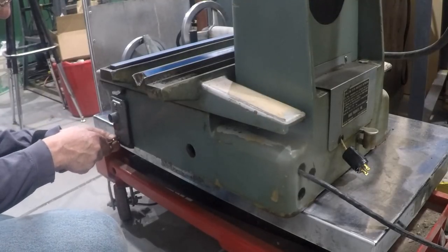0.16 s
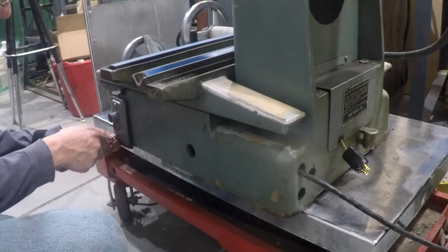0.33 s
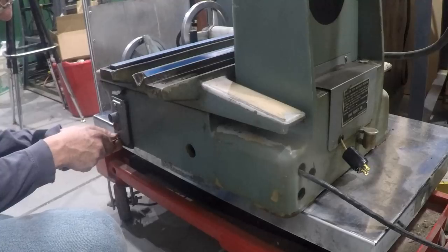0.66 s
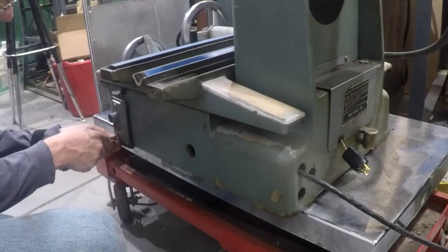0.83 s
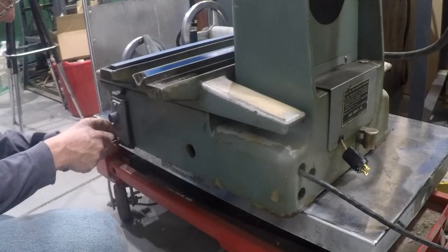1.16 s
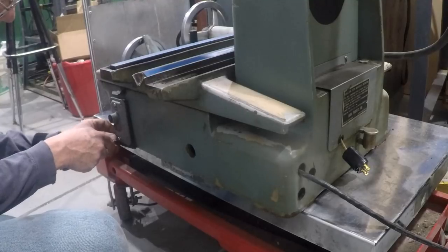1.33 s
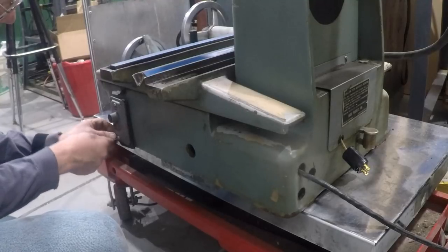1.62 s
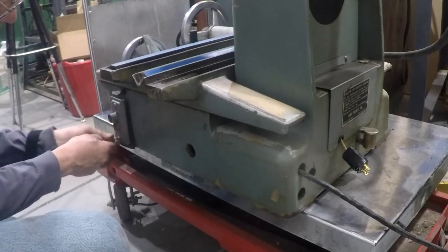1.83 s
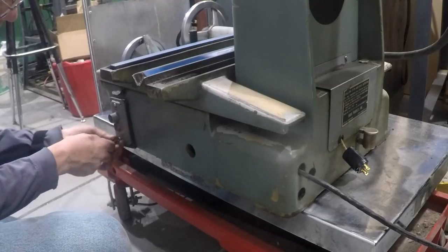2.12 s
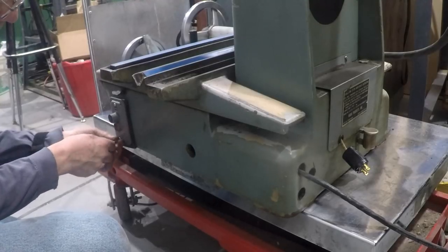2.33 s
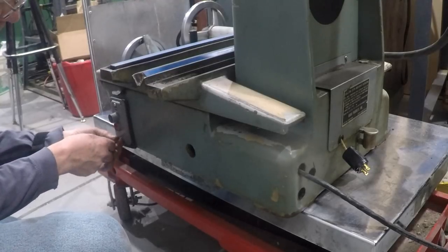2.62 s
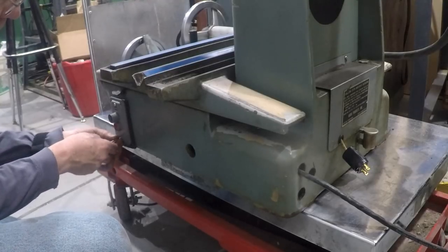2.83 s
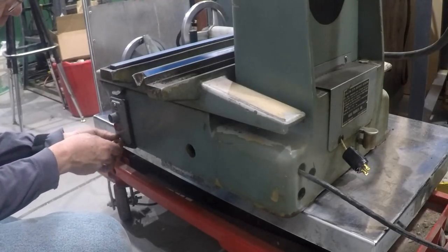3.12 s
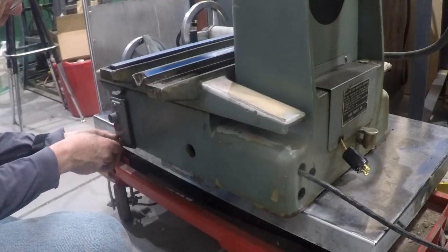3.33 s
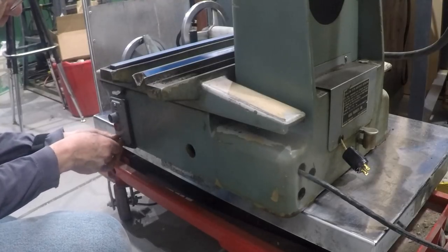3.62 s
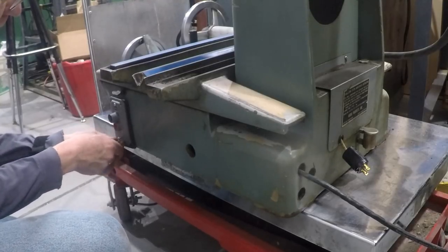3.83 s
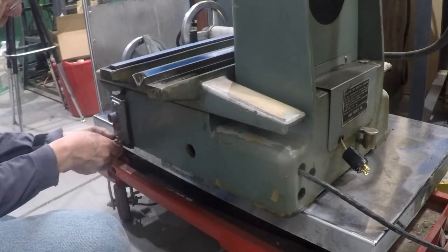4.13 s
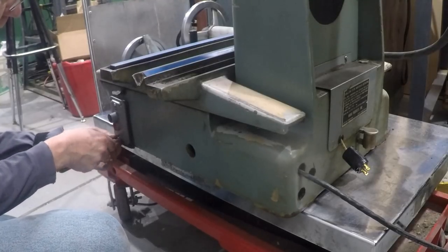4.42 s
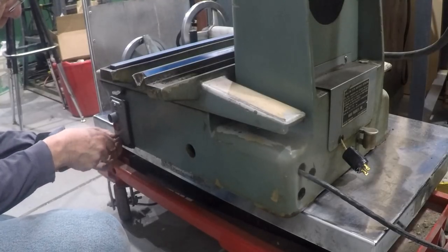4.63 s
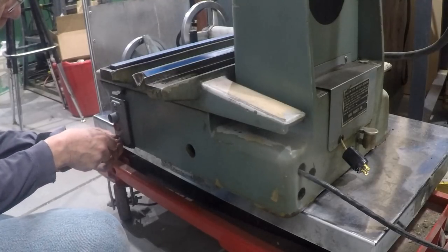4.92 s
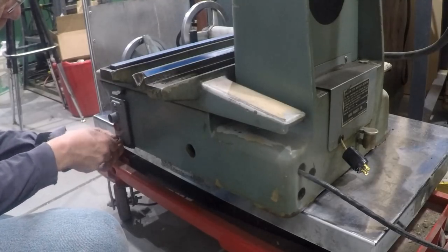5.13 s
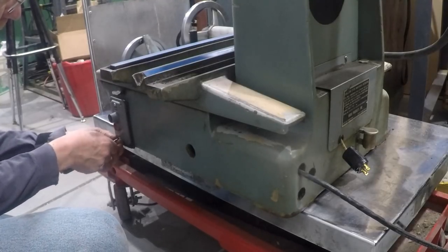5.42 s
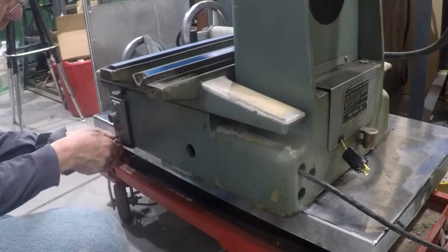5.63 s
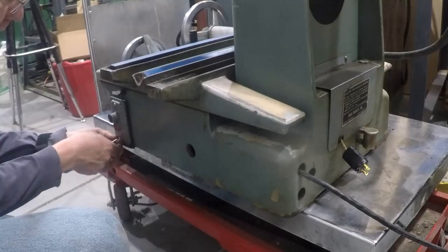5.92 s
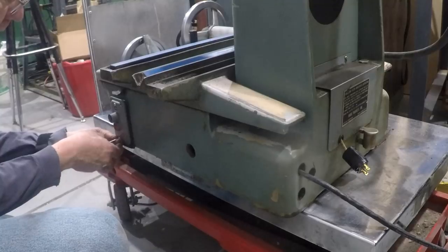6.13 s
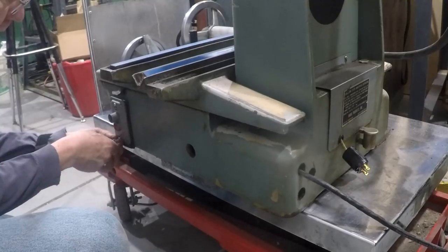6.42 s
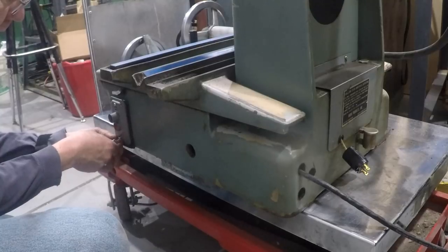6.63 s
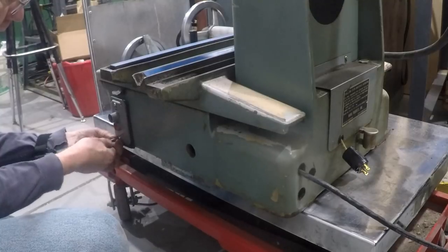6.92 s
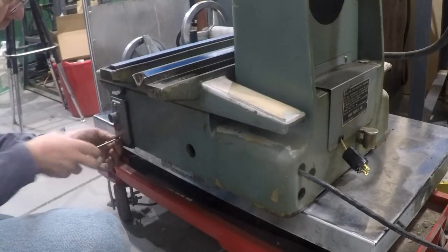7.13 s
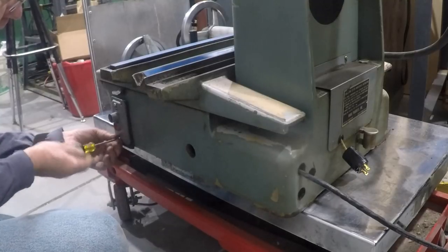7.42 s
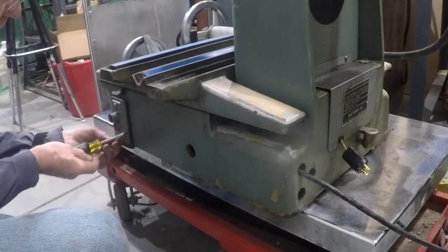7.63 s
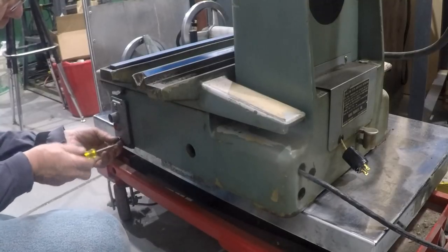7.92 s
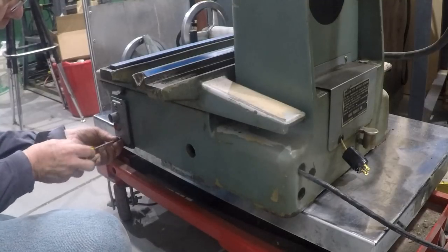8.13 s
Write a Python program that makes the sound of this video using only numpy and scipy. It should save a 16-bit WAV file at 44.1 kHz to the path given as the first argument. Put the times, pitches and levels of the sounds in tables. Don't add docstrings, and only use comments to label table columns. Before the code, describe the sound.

Irregular dry metal clicks, tiny pings and brief gritty scrapes come from a screwdriver fitting screws into a small cover on a heavy cast base. Work is busiest in the first three seconds, snaps loudly near four, thins out, then ends in a harder flurry with dull thuds, a sleeve rustle and another snap. Faint fan hum, airy noise and slight hiss fill the large room; short echo, single nearby microphone.

```python
import sys
import numpy as np
from scipy import signal
from scipy.fft import rfft, irfft, next_fast_len
from scipy.io import wavfile
from scipy.ndimage import uniform_filter1d, map_coordinates

SR = 44100
rng = np.random.default_rng(int(sys.argv[2]) if len(sys.argv) > 2 else 0)


def decibels_to_gain(level_db):
    exponent = np.asarray(level_db, float) / 20
    return 10 ** exponent


def put_to_file(sound):
    columns = np.atleast_2d(sound).T
    safe = np.clip(columns, -1, 1)
    whole_steps = np.round(safe * 32767)
    wavfile.write(sys.argv[1], SR, whole_steps.astype(np.int16))


N = 364266
FLOOR_TOP_HZ = 15350


def unit(x):
    return x / np.sqrt(np.mean(x ** 2) + 1e-20)


def along(points, hz):
    f, value = np.transpose(points)
    return np.interp(np.log(hz + 1), np.log(f + 1), value)


def wobble(rate, size=N):
    steps = np.arange(0, size + 16, 16)
    knots = rng.standard_normal(int(size / SR * 300) + 9)
    curve = map_coordinates(knots, [steps * min(rate, 290) / SR])
    return np.interp(np.arange(size), steps, curve)


def swell(s, db, hold, rise, fall):
    t = np.arange(N) / SR
    return decibels_to_gain(db - rise * np.clip(s - t, 0, None) - fall * np.clip(t - s - hold, 0, None))


def filtered(x, response):
    m = next_fast_len(N + SR // 4, True)
    return irfft(rfft(x, m) * response(np.fft.rfftfreq(m, 1 / SR)), m)[..., :N]


def noise(spectrum):
    white = rng.standard_normal(N)
    return unit(filtered(white, lambda hz: decibels_to_gain(along(spectrum, hz)) * (hz < FLOOR_TOP_HZ)))


def add(track, s, sound):
    part = track[round(s * SR):][:len(sound)]
    part += sound[:len(part)]


def ringing(modes, ragged_db=0, tilt_db=0):
    t = np.arange(SR * 2 // 5) / SR
    out = 0
    for hz, db, t60 in modes:
        beat = ragged_db * wobble(51.2, size=len(t)) if ragged_db else 0
        tilt = tilt_db * np.log2(hz / modes[0][0])
        level_db = db + tilt - 60 * t / min(t60, 0.6) + beat
        out = out + decibels_to_gain(level_db) * np.sin(2 * np.pi * hz * t + 0.12 * beat)
    return out * np.cos(np.pi / 2 * t / t[-1])


def slid(events, modes, ragged_db):
    out = np.zeros(N)
    for s, db, rise, tilt_db in events:
        ring = ringing(modes, ragged_db, tilt_db)
        build_up = 1 - np.exp(-np.arange(len(ring)) / SR / rise)
        add(out, s, decibels_to_gain(db) * ring * build_up)
    return out


# t/s, blade level/dB, bracket level/dB re blade, cover level/dB re blade,
# loudest blade mode f/Hz
STRIKES = [(.3157, -43.5, 3, 2.5, 6440), (.4798, -45, -4, 4, 6200), (.5252, -40.5, 2.5, -28, 6700),
           (.8364, -48, 6.5, -15, 6000), (1.516, -38.5, -11, -20, 5770), (1.5446, -46, -4, -12, 6000),
           (1.5484, -29.5, -7, -15, 6300), (1.6514, -35.5, -14, -10, 5900), (1.6606, -28, -8.5, -23, 5900),
           (1.6736, -22.5, -21, -44, 6350), (2.5845, -39, -5.5, -5, 5900),
           (3.6501, -24.5, -33, -24.5, 5770), (3.9255, -40, -11, -11.5, 5970),
           (4.0063, -43.5, 2.5, -6.5, 5930), (4.4857, -32, -9.5, -26, 6880), (4.8289, -38, -9.5, -8, 6250),
           (6.0165, -53, 0.5, -1, 5000), (6.0237, -31, -16, -24, 6040), (6.1863, -36, -7, -15, 5700),
           (6.6722, -36, -17, -20, 6200), (6.7221, -19.5, -15.5, -43.5, 6680), (7.7064, -34.5, -1, 3, 5280),
           (7.7104, -25, -15, -12, 6700), (7.7614, -31.5, -15, -22, 4530), (7.7734, -21, -25, -18.5, 5500),
           (7.7767, -28, -2.5, -19, 5660)]
# t/s, blade level/dB, loudest blade mode f/Hz
TICKS = [(0.506, -39.5, 7140), (0.6078, -44, 6500), (0.699, -40, 6850), (.7094, -43, 6800),
         (0.7632, -44, 6800), (0.823, -43, 6200), (.8954, -45.5, 6100), (1.0318, -48, 6430),
         (1.2503, -45, 5170), (1.3034, -48, 5180), (1.355, -49, 6130), (1.9684, -45, 5290),
         (2.2466, -50, 5000), (2.3471, -47, 6900), (2.7434, -48.5, 5540), (3.5087, -43, 5400),
         (3.5253, -40.5, 5840), (3.6102, -54, 5070), (4.248, -47, 6800), (4.311, -40, 7050),
         (4.352, -52, 5620), (5.5887, -54.5, 4610), (5.6017, -47.5, 6280), (6.1704, -42, 6210),
         (6.6064, -56, 6220), (6.708, -45.5, 6050), (7.6188, -43.5, 6040), (7.7547, -50, 5300),
         (8.0283, -46, 5500)]
# t/s, blade level/dB, cover level/dB re blade
KNOCKS = [(0.4703, -47.5, 6), (.8041, -55.5, 12), (.8639, -52, 5), (1.0051, -57, 9.5), (1.0221, -55, 0),
          (1.1902, -49.5, 4.5), (1.3844, -55.5, -1), (1.8392, -58, 5), (2.0197, -52, 9.5), (2.1455, -61, 0),
          (2.168, -46.5, 0.5), (2.1798, -46, -5), (2.3147, -53.5, 12), (2.4867, -54.5, 2), (2.6204, -51, 4),
          (2.7564, -58, -7), (2.8888, -60.5, 10), (4.893, -66, 18), (5.242, -54, 3), (5.9544, -64, 12.5),
          (7.5993, -54.5, 8), (7.6984, -41, 1.5), (7.8774, -41, -3), (4.992, -59.5, 6.5),
          (5.195, -63.5, 6.5), (5.592, -59, 2.5), (4.316, -67, 13), (4.496, -61, 6)]


def contacts():
    light = [(s, db, -12, -18.5, hz) for s, db, hz in TICKS]
    knocks = [(s, db, 1.5, cover_db, 5500) for s, db, cover_db in KNOCKS]
    return STRIKES + light + knocks


def touches():
    force, tip = np.zeros((3, N)), np.zeros(N)
    t = np.arange(1500) / SR
    for s, db, bracket_db, cover_db, hz in contacts():
        t60 = 0.0082 * (3.0 + 0.024 * (db + 45.5))
        burst = rng.standard_normal((3, len(t))) * decibels_to_gain(-60 * t / np.clip(t60, 0.002, 0.05))
        burst /= np.linalg.norm(burst, axis=1, keepdims=True)
        levels_db = [db + 21.5, db + bracket_db + 26, db + cover_db + 38.5]
        for k, level_db in enumerate(levels_db):
            add(force[k], s + 0.0007923, decibels_to_gain(level_db) * burst[k])
        mode = decibels_to_gain(-60 * t[:400] / 0.0041) * np.sin(2 * np.pi * hz * t[:400])
        add(tip, s + 0.0008006, decibels_to_gain(db + 2.5) * np.convolve(burst[0], mode))
    return force, tip


# t/s, length/s, blade level/dB rms,
# bracket level/dB rms, cover level/dB rms
SCRAPES = [(0.683, 0.082, -60, -61, -70.5), (0.784, 0.14, -63, -61.5, -60.5), (1.002, 0.057, -68, -62, -55),
           (1.646, 0.083, -49.5, -50, -59), (2.02, 0.16, -71.5, -68, -76), (2.149, 0.13, -77, -72, -61.5),
           (2.34, 0.042, -64, -61, -59.5), (2.582, 0.11, -75, -69, -59.5), (2.725, 0.13, -67, -62.5, -63.5),
           (2.852, 0.043, -80, -81, -63), (3.008, 0.15, -70, -71, -71), (3.411, 0.032, -50.5, -45.5, -55),
           (4.006, 0.04, -53, -49, -47), (4.794, 0.11, -72, -74, -61), (5.938, 0.089, -82, -77.5, -65.5),
           (6.173, 0.06, -75, -56, -54.5), (6.576, 0.041, -69, -62.5, -85), (6.702, 0.017, -51, -54, -60),
           (6.718, 0.045, -50.5, -49, -53), (7.577, 0.14, -66, -66, -65), (7.694, 0.085, -52.5, -53, -53),
           (7.758, 0.09, -69, -46.5, -55), (7.863, 0.022, -71, -42, -52), (8.149, 0.054, -70.5, -70, -66)]


def scrapes():
    strokes = np.zeros((3, N))
    grit = unit(decibels_to_gain(2.3 * wobble(260)) * rng.standard_normal((3, N)))
    for s, length, blade_db, bracket_db, cover_db in SCRAPES:
        stroke = np.abs(np.sin(np.pi * np.linspace(0, 1, round(length * SR)) ** 0.57))
        for k, level_db in enumerate([blade_db + 13.5, bracket_db + 7.0, cover_db + 20.0]):
            add(strokes[k], s, decibels_to_gain(level_db) * stroke)
    return strokes * grit


def body(force, peaks):
    def response(f):
        total = 0
        for k, (centre, width, db) in enumerate(peaks):
            damping = 1j * f * width
            total = total + (-1) ** k * decibels_to_gain(db) * damping / (centre ** 2 - f ** 2 + damping)
        return total
    return filtered(force, response)


# f/Hz, width/Hz, level/dB
BLADE = [(4430, 1800, -20.5), (6050, 1400, -1.5), (7890, 270, -8), (10330, 3200, -23)]
# f/Hz, width/Hz, level/dB
BRACKET = [(1417, 1200, -23.5), (2010, 330, 1.5), (2662, 210, 6.5), (3100, 500, -3)]
# f/Hz, width/Hz, level/dB
COVER = [(440, 53, -6.5), (548, 35, 2.5), (599, 48.4, 5), (798, 194, -5.5), (880, 320, -10)]


def bodies(force):
    return body(force[0], BLADE) + body(force[1], BRACKET) + body(force[2], COVER)


# t/s, level/dB, rise/s, tilt/dB per octave
FLICKS = [
    (.526, -51, 0.0007, 1),
    (.7, -57, 0.0022, 0.1),
    (.838, -57, .002, -1.1),
]
# f/Hz, level/dB, t60/s
SHANK = [(2783, -0.5, 0.16), (4450, -8, .25), (6860, -12, .1), (7278, -8, .055), (2013, -8, .065)]


def flicks():
    return slid(FLICKS, SHANK, ragged_db=2.5)


# t/s, level/dB
CLICKS = [(1.5492, -25.5), (1.6614, -25), (1.6745, -21), (1.6769, -22), (6.0249, -24), (6.1869, -26),
          (6.673, -35), (6.723, -22), (7.7566, -19), (7.76, -27), (7.7789, -12.5), (7.845, -13.5),
          (7.847, -16)]


def clicks():
    out, t = np.zeros(N), np.arange(400) / SR
    for s, db in CLICKS:
        add(out, s, decibels_to_gain(db - 60 * t / 0.0021) * np.sin(2 * np.pi * 5000 * t))
    return out


# t/s, lasting ring level/dB, crack level/dB, casting tail level/dB, tail t60/s
SNAPS = [
    (4.0787, -48.5, -23, -21, 0.089),
    (7.8388, -43, -22.5, -19, 0.049),
]
# f/Hz, level/dB, t60/s
SNAP_MODES = [
    [(1870, -11, .38), (2250, -9.5, .28), (2449, -13.5, .24), (2710, -4, .25), (2772, -3.5, .6),
     (2950, -5, .2), (3155, -12.5, .41), (4260, -16.5, .3), (4520, -4.5, 0.4), (4540, -10, .3),
     (5276, -18, .3), (6325, -7.5, 0.36), (6804, -12.5, .3), (7310, -17.5, .3)],
    [(1098, -14, .3), (1850, -5, 0.41), (2020, -4, .31), (2304, -10, .3), (2789, -6, .5), (2918, -6, .4),
     (3100, -7, .31), (3720, -15.5, .15), (4510, -2.5, 0.42), (4530, -4, .34), (4570, -7, .35),
     (6320, -17, .16), (6788, -14, .3), (5927, -20, .28)],
]
BLOW_HZ = [
    [1860, 2090, 2449, 2564, 2694, 2768, 2957, 3100, 3354, 4188, 4432, 6331, 6826, 8716],
    [1841, 2110, 2390, 2856, 2990, 3300, 4320, 4523, 5718, 6290, 6805, 7337, 8744, 11640],
]
# level/dB, t60/s
BLOW_MODES = [
    [(-26.5, 0.054), (-12, 0.048), (-11.5, 0.041), (-14.5, 0.047), (0.5, 0.022), (-9.5, 0.034),
     (-12.5, 0.029), (-4.5, 0.034), (-26, .04), (-10, .016), (-10.5, 0.075), (-13, .07), (-13.5, 0.056),
     (-22, 0.032)],
    [(-33, 0.087), (-6, 0.02), (-13, .05), (-14, 0.044), (1.5, 0.0093), (-24, 0.019), (-3.5, 0.011),
     (-12, 0.024), (-16, 0.044), (-7, 0.037), (-7, 0.044), (-21, 0.049), (-12.5, 0.021), (-14, 0.026)],
]


def snaps():
    out, t = np.zeros(N), np.arange(SR * 2 // 5) / SR
    rise = 1 - np.exp(-t / 0.00027)
    for snap, modes, pitches, damped in zip(SNAPS, SNAP_MODES, BLOW_HZ, BLOW_MODES):
        s, ring_db, crack_db, tail_db, tail_t60 = snap
        grains, casting = rng.standard_normal((2, len(t)))
        smooth = uniform_filter1d(uniform_filter1d(grains, size=3), size=2)
        crack = rise * decibels_to_gain(crack_db - 60 * t / 0.046) * np.diff(smooth, prepend=0)
        blow_modes = [(hz, db, t60) for hz, (db, t60) in zip(pitches, damped)]
        blow = rise * decibels_to_gain(-11.5) * ringing(blow_modes) + crack
        add(out, s, blow + decibels_to_gain(ring_db) * rise * ringing(modes, ragged_db=4.0))
        casting *= decibels_to_gain(-60 * t / tail_t60)
        casting /= np.linalg.norm(casting)
        tail = signal.fftconvolve(blow + decibels_to_gain(11.5) * crack, casting)
        add(out, s + 0.0033, decibels_to_gain(tail_db) * tail)
    return out


# t/s, level/dB, f/Hz, t60/s
PINGS = [(3.413, -45, 2304, .08), (3.413, -47, 2660, .07), (3.413, -49, 3100, 0.053),
         (3.416, -44, 1530, 0.081), (3.651, -56, 590, 0.083), (3.651, -49, 3100, .04),
         (3.651, -49, 2700, 0.037), (4.007, -48, 1523, .2), (4.079, -32, 560, 0.07),
         (6.724, -55, 578, 0.41), (7.879, -46, 4640, .09), (6.734, -44, 3740, .06),
         (4.079, -39, 1520, 0.092), (4.486, -43.5, 4554, 0.058), (4.486, -58, 4404, .2),
         (4.486, -50, 6885, 0.093), (6.722, -41.5, 2680, .07), (6.722, -47, 1803, .12),
         (.4705, -48.5, 2000, .05), (.4705, -54, 2750, .05), (.712, -57, 2020, .06),
         (.7115, -52, 7250, .06), (7.932, -56, 1050, .06), (.53, -50, 7200, 0.072), (0.701, -50, 6800, .09),
         (.84, -58, 6700, .07), (7.877, -45, 3720, .05), (1.913, -53.5, 4550, 0.21),
         (4.089, -21.5, 4445, 0.044), (4.0915, -23, 2780, .03), (6.026, -52, 1810, 0.16),
         (6.034, -55, 3144, 0.14), (6.025, -48, 4650, .05), (6.025, -57, 745, .4),
         (6.188, -54.5, 1803, .17), (6.188, -58, 2972, 0.16), (6.724, -57, 528, .61), (6.724, -57, 711, .6),
         (6.188, -50, 802, 0.43), (6.19, -63, 2654, 0.32), (7.711, -31.5, 7100, 0.033),
         (7.785, -44, 5840, 0.09), (7.792, -43, 2960, 0.13), (7.847, -14.5, 4494, 0.029),
         (7.848, -20.5, 2860, 0.021), (7.8766, -34, 4520, 0.04), (7.878, -35, 2930, 0.043),
         (7.886, -32, 1960, 0.038),
         (4.085, -52, 711, .55),
    (4.1, -58, 4475, .5),
    (6.726, -53, 610, 0.63),
    (6.726, -59, 851, .35),
    (7.84, -39, 572, .09),
    (7.86, -54, 4480, .58),
    (7.86, -57, 2789, 0.51),
    (.4705, -47, 560, .09),
    (1.022, -52, 587, .09),
]


def pings():
    out, t = np.zeros(N), np.arange(SR * 2 // 5) / SR
    rise = 1 - np.exp(-t / 0.0006)
    for s, db, hz, t60 in PINGS:
        add(out, s, rise * ringing([(hz, db, t60)], ragged_db=1.0))
    return out


# t/s, level/dB, rise/s, tilt/dB per octave
SLIDES = [
    (3.0, -53, 0.046, -16),
    (3.414, -40, 0.01, -0.5),
    (4.006, -38.5, 0.016, -5.5),
    (6.186, -52.5, 0.0051, -2),
    (6.723, -54.5, .008, -6),
    (7.778, -59, 0.0061, 9),
]
# f/Hz, level/dB, t60/s
PLATE = [(711, -8.5, .45), (754, -7, 0.41), (802, -1, .4), (851, -10.5, .33), (1523, -2, .33),
         (1555, -6, .25), (1803, -13, .2), (2304, -8, .2), (2659, -11, 0.18), (2972, -14.5, .2),
         (3100, -14, .16)]


def slides():
    return slid(SLIDES, PLATE, ragged_db=4.5)


# t/s, level/dB, rise/s, tilt/dB per octave
JOLTS = [(.471, -64, 0.0042, 2), (1.02, -56, 0.0038, -10), (1.55, -56.5, 0.005, -4),
         (1.67, -56, 0.057, 7.5), (4.078, -62, 0.00084, 8), (6.024, -67.5, 0.0076, 6),
         (6.187, -62, 0.0045, 4), (1.21, -51, 0.018, -18), (6.722, -49, 0.021, 4), (7.7, -40, 0.024, -7.5),
         (7.838, -52, 0.0012, 6.5)]
# f/Hz, level/dB, t60/s
DECK = [(229, -5, 0.44), (259.2, 2.5, 0.21), (324, -10, .3), (376, 2.5, 0.17), (447, -4.5, 0.38),
        (527, -1.5, 0.24), (580, -2.5, .24), (653, -8, 0.32), (718, 0.5, 0.24), (812, -6, 0.27),
        (877, -11.5, 0.18), (966, -13.5, 0.16)]


def jolts():
    return slid(JOLTS, DECK, ragged_db=3.5)


# t/s, level/dB rms, t60/s
THUDS = [
    (6.026, -60, 0.39),
    (6.189, -56, 0.34),
    (6.724, -61, 0.45),
    (7.701, -45.5, 0.28),
    (7.84, -44.5, 0.19),
]
# f/Hz, level/dB per Hz
CASTING = [(300, -46), (800, -2), (1500, -0.5), (3500, -18)]


def thuds():
    t = np.arange(N) / SR
    gain = sum((t > s) * decibels_to_gain(db - 60 * np.abs(t - s) / t60) for s, db, t60 in THUDS)
    return gain * noise(CASTING)


# f/Hz, level/dB per Hz
CLOTH = [(240, -41.5), (400, -9), (793, -1.5), (1120, -9), (1300, -6.5), (2730, -5.5), (3620, -10),
         (5320, -0.5), (14000, -27)]


def sleeve():
    grains = unit(decibels_to_gain(1.4 * wobble(160)) * noise(CLOTH))
    rustle = decibels_to_gain(2.5) * swell(7.375, db=-58, hold=0.03, rise=75, fall=125) * grains
    floor = noise([(120, -26.0), (200, 2.5), (240, 7.5), (350, -4.0), (600, -38)])
    shuffle = swell(7.0, db=-59.5, hold=0.52, rise=248, fall=58) * decibels_to_gain(2.5 * wobble(15)) * floor
    push = swell(7.5, db=-52, hold=0.05, rise=90, fall=73) * noise(RUMBLE)
    return rustle + shuffle + push


# f/Hz, t60/s
ROOM = [(200, 0.5), (800, 0.63), (3000, 0.4), (7000, 0.3), (12000, 0.25)]


def room(x):
    hz, t, z = signal.stft(rng.standard_normal(SR * 3 // 4), SR, nperseg=256)
    fade = decibels_to_gain(-60 * t / along(ROOM, hz)[:, None])
    tail = signal.istft(z * fade, SR, nperseg=256)[1]
    return signal.fftconvolve(np.pad(x, (300, 0)), tail / np.linalg.norm(tail))[:N]


# f/Hz, level/dB rms, unsteadiness/dB
HUM = [(89.7, -60.5, 1.5), (152.3, -71.5, 3.5), (231.6, -77, 1.5), (281.4, -76.5, -1), (116.7, -71, 3)]
# t/s, drone level/dB
BUSTLE = [
    (0.0, -68.5),
    (0.34, -69.5),
    (0.76, -63),
    (4.81, -67),
    (4.99, -65),
    (5.36, -67),
    (7.04, -64),
    (7.2, -63),
    (8.26, -67),
]
# f/Hz, level/dB per Hz
RUMBLE = [(12, -33), (22, 0.5), (40, -3.5), (65, -4), (110, -14.5), (160, -47)]
# f/Hz, level/dB per Hz
DRONE = [(50, -26), (80, -4), (120, -1.5), (280, -4), (400, -11), (520, -12), (900, -27), (2000, -43)]
# f/Hz, level/dB per Hz
AIR = [(400, -14), (700, -1.5), (1900, -4.5), (2700, -3.5), (3800, -5.5), (4600, -5.5), (5100, -1.5),
       (5700, -4), (6200, -0.5), (6800, -5), (7200, -1.5), (8300, -9), (13900, -9), (15300, -9.5)]


def hall():
    t = np.arange(N) / SR
    out = np.zeros(N)
    for hz, db, sway_db in HUM:
        tone = np.sin(2 * np.pi * hz * t + 0.4 * wobble(12.0))
        out += np.sqrt(2) * decibels_to_gain(db + sway_db * wobble(6.3)) * tone
    out += decibels_to_gain(-65.5 + 1.486 * wobble(3.89)) * noise(RUMBLE)
    drone_db = np.interp(t, *np.transpose(BUSTLE))
    out += decibels_to_gain(drone_db + 1.48 * wobble(8.4)) * noise(DRONE)
    return out + decibels_to_gain(-67 + 0.85 * wobble(4.7)) * noise(AIR)


# f/Hz, level/dB per Hz
HISS = [(20, 2), (150, -27), (240, -4), (12500, -1), (15200, -5)]


def hiss():
    return decibels_to_gain(-72) * np.array([noise(HISS), noise(HISS)])


def scene():
    force, tip = touches()
    work = bodies(force + scrapes()) + tip + flicks() + clicks()
    work += snaps() + pings() + slides() + jolts() + thuds()

    def shade(hz):
        return (hz < FLOOR_TOP_HZ + 1150) / (1 + 1j * hz / 10000) ** 2 / (1 + (hz / 15200) ** 9)
    work = filtered(work, shade)
    return np.tile(work + decibels_to_gain(-17.5) * room(work) + sleeve() + hall(), (2, 1))


def band_limit(x):
    return signal.sosfilt(signal.butter(12, 16470, fs=SR, output="sos"), x)


def record(dry):
    return band_limit(dry + hiss())


dry = scene()
out = record(dry)
put_to_file(out)
```